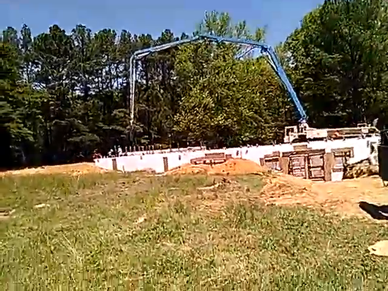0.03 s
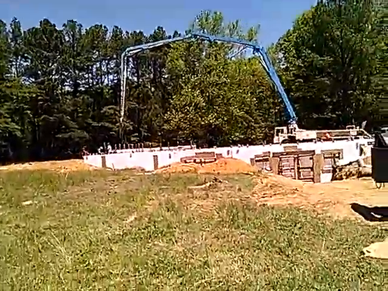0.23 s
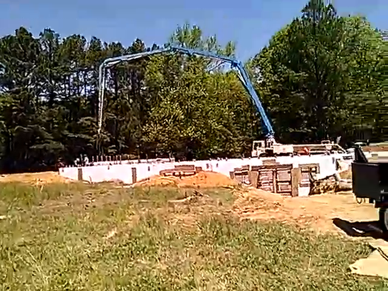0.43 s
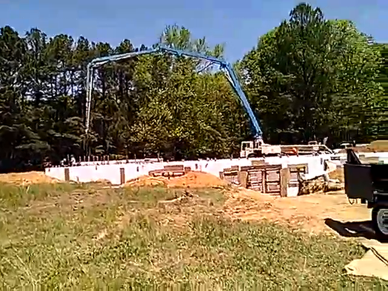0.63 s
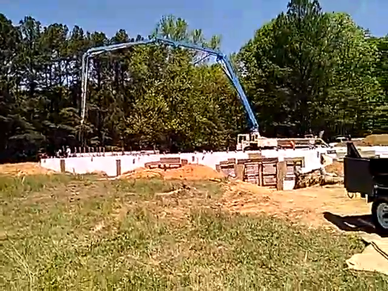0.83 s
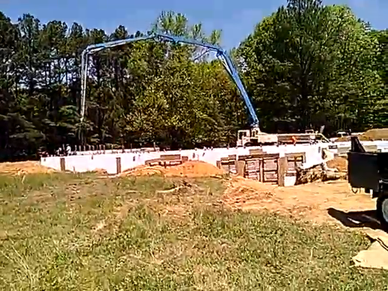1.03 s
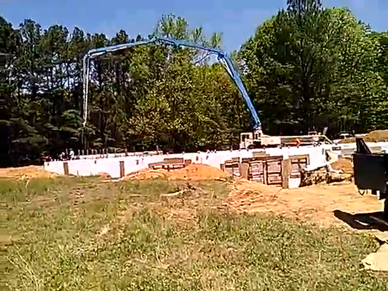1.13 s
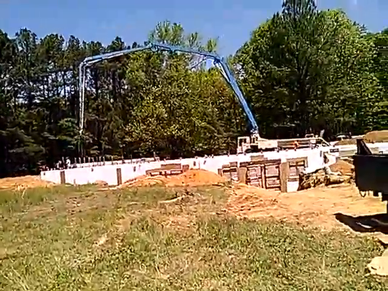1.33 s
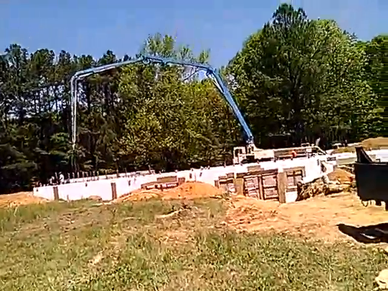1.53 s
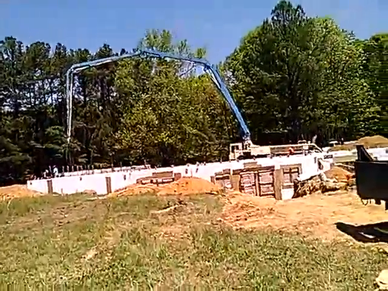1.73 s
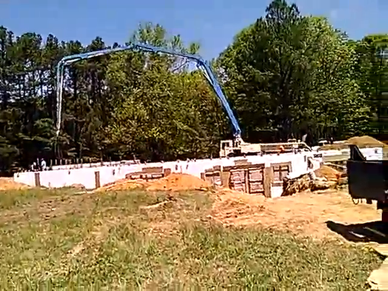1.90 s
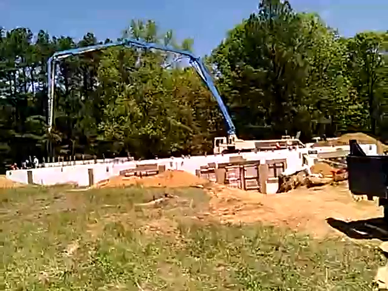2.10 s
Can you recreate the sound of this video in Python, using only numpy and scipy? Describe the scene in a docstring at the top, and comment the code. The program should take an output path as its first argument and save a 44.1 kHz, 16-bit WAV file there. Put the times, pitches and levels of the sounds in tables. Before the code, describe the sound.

A concrete pump truck's diesel drones steadily in the distance outdoors, with low throb, blurred clatter and faint whines; wind thuds on a hand-held phone microphone, and close rustles and tiny ticks come and go.

```python
"""A concrete pump truck runs steadily far across a building site: pulsed firings give a low throb, gated noise
the diesel clatter, blurred by the tree line, and wavering sines the faint whines; two thin squeals glide up.
Wind buffets the microphone of a hand-held phone: low noise follows the gusts in two bands.
Close by, dry grass and clothing rustle as the holder turns: grains and hiss, with a soft rasp of gliding
noise. Decaying sines and noise bursts make the sharp ticks, dull scuffs and light knocks."""
import sys
import numpy as np
from scipy import signal
from scipy.fft import rfft, irfft
from scipy.io import wavfile
from scipy.ndimage import uniform_filter1d, map_coordinates

SR = 44100
rng = np.random.default_rng(int(sys.argv[2]) if len(sys.argv) > 2 else 0)


def store_pcm(level_fs):
    """Save levels as 16-bit WAV."""
    pcm = np.round(np.clip(level_fs, -1, 1) * 32767).astype(np.int16)
    wavfile.write(sys.argv[1], SR, np.atleast_2d(pcm).T)


N = 95256  # length in samples

# Spectrum tables give relative density; the level is set where the noise is used.
# Diesel clatter and fan, as heard from afar [f/Hz, density/dB]
CLATTER_SPECTRUM = [(150, 4.5), (260, 1.5), (380, 1), (520, 2.5), (690, 3.5), (770, 0.5), (1000, 0.5),
                    (1230, 0.5), (1330, 3.5), (1500, -11), (2000, -10.5), (2750, -12.5), (3150, -9),
                    (3420, -6.5), (3700, -10), (4200, -11), (5200, -16), (6900, -11.5), (8000, -19.5),
                    (10000, -24.5), (11000, -29), (14500, -26)]
# Steady tones of the pump and its drive [f/Hz, rms level/dB]
WHINE_TONES = [(188, -62), (293, -73), (324, -78), (358, -75), (506.4, -72.5), (656.5, -70), (703, -70.5),
               (1013, -83), (1334, -73.5), (3360, -80), (3855, -90)]
# Side relative to mid in a stereo pair [f/Hz, level/dB]
SIDE_SPECTRUM = [(2500, -69), (3700, -46), (4300, -37), (5500, -11), (8000, -6.5), (14000, -2.5)]
# Brief thin squeals [t/s of the middle, half length/s to 1/e, f/Hz at the middle, glide/(Hz/s), rms level/dB]
SQUEAL_EVENTS = [(1.098, 0.052, 1113, 1603, -60), (1.135, 0.054, 1746, 149.8, -56.5)]
# Deep wind eddies on the microphone [f/Hz, density/dB]
EDDY_SPECTRUM = [(20, -27), (28, -22), (37, -7), (50, 6), (62, 4), (80, 2.5), (100, -5.5), (150, -33.5),
                 (400, -76)]
# Lighter wind flutter above them [f/Hz, density/dB]
FLUTTER_SPECTRUM = [(60, -13), (95, 2.5), (130, 1.5), (150, -6.5), (200, -15), (250, -30.5), (400, -49),
                    (1500, -57.5)]
# Gusts [t/s, deep rms level/dB, flutter rms level/dB]
GUST_LEVELS = [(0.0, -44.5, -57), (0.03, -35, -40), (0.07, -38, -68), (0.09, -52, -58), (0.13, -35, -45.5),
               (0.37, -41.5, -44), (0.4, -37, -36), (0.44, -44, -65), (0.47, -34, -53),
               (0.49, -45.5, -44.5), (0.58, -35, -50), (0.72, -37, -41.5), (0.78, -52, -54),
               (0.84, -45, -47), (0.87, -44, -57), (0.9, -42, -44), (0.94, -53, -49.5), (0.97, -39, -48),
               (1.06, -51.5, -47), (1.09, -42, -62), (1.12, -46, -49), (1.14, -33.5, -47), (1.23, -44, -46),
               (1.28, -40.5, -43.5), (1.36, -54, -47), (1.38, -34, -36.5), (1.42, -49, -47.5),
               (1.48, -29.5, -35), (1.51, -41, -48.5), (1.56, -35, -41.5), (1.59, -49, -45),
               (1.61, -35.5, -52), (1.7, -43.5, -46), (1.74, -35.5, -42), (1.77, -40.5, -55),
               (1.83, -39.5, -40), (1.88, -33.5, -59), (1.93, -45.5, -43.5), (2.04, -42.5, -46.5),
               (2.16, -30.5, -46.5)]
# Rustle of grass and cloth [f/Hz, density/dB]
RUSTLE_SPECTRUM = [(400, -8), (1100, -3.5), (2000, 8), (3200, -4), (4000, -2.5), (5400, 1), (6300, 8),
                   (7500, -3), (8400, 7.5), (9700, 10), (10600, -1), (12200, -1.5), (13200, -2),
                   (14200, -6)]
# Strength of the rustle [t/s, rms level/dB]
RUSTLE_LEVELS = [(0, -56.5), (.05, -51.5), (.11, -65), (.2, -67), (.27, -52.5), (.31, -60.5), (.355, -59),
                 (.39, -73), (.5, -62), (.57, -69.5), (.65, -61.5), (.8, -69.5), (.89, -57), (1.04, -59.5),
                 (1.15, -65), (1.24, -57), (1.36, -61), (1.48, -66), (1.75, -87), (1.785, -59.5),
                 (1.83, -70), (1.928, -59), (1.945, -51.5), (2.035, -52.5), (2.06, -57), (2.11, -67),
                 (2.16, -60.5)]
# Soft midrange rasp, at its reference pitch RASP_HZ [f/Hz, density/dB]
RASP_SPECTRUM = [(400, -41), (1000, -35), (1450, 2.5), (1600, 0), (1760, 1.5), (1950, -10), (2600, -17.5),
                 (6000, -59)]
# Movement of the rasp [t/s, rms level/dB, centre f/Hz]
RASP_PATH = [(0, -53.5, 1582), (.06, -56.5, 1563), (0.109, -61, 1644), (.2, -59.5, 1658),
             (.29, -56.5, 1602), (.35, -59, 1430), (.4, -73, 1457), (.7, -67.5, 1542), (.83, -60.5, 1599),
             (1.0, -62.5, 1686), (1.17, -62.5, 1700), (1.23, -63.5, 1654), (1.6, -69.5, 1601),
             (1.8, -60, 1599), (2.16, -61.5, 1587)]
# Dull scuffs of the hand on the phone; the first is a brief burst of noise joining the snap at 0.288 s [t/s,
# level/dB at the crest, decay/s]
SCUFF_EVENTS = [(0.2873, -49.5, 0.0028), (1.78, -60, 0.0099), (1.936, -49, 0.024), (1.982, -55.5, 0.027)]
# Colour of a scuff [f/Hz, density/dB]
SCUFF_SPECTRUM = [(500, 0), (1100, 5), (2000, -5.5), (3100, 0.5), (4200, -16), (8000, -8)]
# Dry stalks snapping [t/s, ring peak/dB, ring f/Hz, decay/s, crack level/dB before its colour]
SNAP_EVENTS = [(.0353, -41, 9500, .0004, -56), (0.288, -50, 9400, 0.0013, -40.5),
               (0.366, -42, 9050, 0.00018, -64), (0.505, -47.5, 6000, .0003, -63),
               (0.792, -55, 9000, .0006, -62), (0.81, -53, 8100, 0.00072, -64),
               (.916, -47.5, 9010, 0.00052, -55), (.966, -50, 7400, 0.00047, -63),
               (1.034, -52, 7500, 0.00042, -45), (1.158, -49, 7730, 0.00051, -55),
               (1.192, -55, 7520, 0.00052, -65), (1.2393, -48, 8850, 0.00065, -49),
               (1.319, -51, 7350, 0.00064, -58), (1.3464, -30.5, 8930, 0.00027, -33),
               (1.3554, -47.5, 6850, 0.00068, -50), (2.0403, -48, 9300, 0.00034, -54)]
# Colour of a snap's crack [f/Hz, gain/dB]
CRACK_SPECTRUM = [(500, -7), (2000, 4), (3800, -3.5), (5200, 1), (7000, -8), (9500, 8), (11500, -1),
                  (14000, -0.5)]
# Light knocks on the phone [t/s, level/dB before the mode gains]
KNOCK_EVENTS = [(1.183, -53), (1.784, -50)]
# Modes of the phone case [f/Hz, gain/dB, 60 dB decay time/s]
CASE_MODES = [(1900, -5, 0.0099), (2520, 0, 0.019), (3020, -7, 0.012), (4380, -10, 0.017)]

FIRING_HZ, SPEED_WANDER = 65.57, 0.00341  # mean rate, rms fraction of the speed
FIRING_SCATTER_DB = -4  # factor on a normal draw, so either sign scatters alike
THROB_DB, THROB_TOP_HZ = -49.5, 110
CLATTER_DB, CLATTER_DEPTH, CLATTER_FLICKER_DB = -52, 0.094, 1.5
TREES_DB, TREES_T60_S = -8.5, 0.99
SQUEAL_WANDER_HZ = 43.7  # rms
GRAIN_RATE_HZ, GRAIN_SPREAD_DB, GRAIN_SHARE = 1300, 3.5, 0.9  # share is relative to the hiss
RASP_HZ = 1598.6
TICK_TAIL, TICK_TAIL_S = 0.33, 0.0036  # relative to the crack, decay time
LOW_CUT_HZ, TOP_HZ = 34.2, 14400


def pump_truck():
    """Periodic excitation: uneven firings throb, clatter pulses three times a firing, and the drive whines."""
    turns = np.cumsum(1 + SPEED_WANDER * walk(4.294)) / SR  # time as warped by the engine speed, s
    cycle = FIRING_HZ * turns
    firing_size = undb(FIRING_SCATTER_DB * rng.standard_normal(512))[cycle.astype(int)]

    puffs = firing_size * np.sin(np.pi * (cycle % 1)) ** 4
    band = signal.butter(2, [40, THROB_TOP_HZ], "band", fs=SR, output="sos")
    throb = unit(signal.sosfilt(band, puffs - puffs.mean()))

    pulses = 1 + CLATTER_DEPTH * firing_size * np.cos(6 * np.pi * cycle)
    gate = pulses * undb(CLATTER_FLICKER_DB * walk(40.13))
    mid, side = (unit(trees(colour(gate * rng.standard_normal(N), CLATTER_SPECTRUM))) for _ in range(2))

    whine = np.zeros(N)
    for hz, db in WHINE_TONES:
        level = undb(db + 0.8 * walk(6.54)) * np.sqrt(2)  # rms to peak
        whine += level * np.sin(2 * np.pi * hz * turns + 0.83 * walk(12))
    return undb(THROB_DB) * throb + undb(CLATTER_DB) * spread(mid, side) + whine


def trees(x):
    """Diffuse scattering: the tree line adds an echo of exponentially decaying noise."""
    t = np.arange(SR // 2) / SR
    tail = rng.standard_normal(len(t)) * np.exp(-np.log(1000) * t / TREES_T60_S)
    echo = signal.fftconvolve(x, tail / np.linalg.norm(tail))[:N]
    return x + undb(TREES_DB) * echo


def squeals():
    """Frequency modulation: narrow, wavering tones swell once and glide upward."""
    out = np.zeros(N)
    for middle, half, hz, glide, db in SQUEAL_EVENTS:
        t = np.arange(N) / SR - middle
        phase = np.cumsum(hz + glide * t + SQUEAL_WANDER_HZ * walk(150)) / SR
        level = undb(db + 2 * walk(80.1)) * np.sqrt(2)  # rms to peak
        swell = np.exp(-(t / half) ** 2)
        out += level * swell * np.sin(2 * np.pi * phase)
    return out


def wind():
    """Turbulent pressure: eddies at the microphone rumble and flutter, each band following the gusts."""
    out = np.zeros(N)
    for column, spectrum in [(1, EDDY_SPECTRUM), (2, FLUTTER_SPECTRUM)]:
        eddies = colour(rng.standard_normal(N), spectrum)
        power = uniform_filter1d(np.abs(signal.hilbert(eddies)) ** 2, size=1300) / 2
        steady = eddies / np.sqrt(power)  # the gusts alone then set the level
        out += steady * curve(np.array(GUST_LEVELS)[:, [0, column]])
    return out


def rustle():
    """Stick-slip friction: dense slips of grass and cloth over a hiss, with a soft rasp of sliding resonance."""
    times, db, hz = np.array(RASP_PATH).T
    # reading the noise faster or slower shifts its resonance
    place = np.cumsum(np.interp(np.arange(N) / SR, times, hz) / RASP_HZ)
    rasp_noise = unit(colour(rng.standard_normal(N), RASP_SPECTRUM))
    rasp = map_coordinates(rasp_noise, [place], mode="mirror")
    return spread(slips(), slips()) * curve(RUSTLE_LEVELS) + rasp * curve(np.c_[times, db])


def slips():
    """Random impulse process: sparse grains of either sign and uneven size join a smooth hiss."""
    hits = rng.random(N) < GRAIN_RATE_HZ / SR
    size = undb(GRAIN_SPREAD_DB * np.minimum(rng.exponential(size=N), 4))
    grains = hits * rng.choice([-1, 1], N) * size
    hiss = rng.standard_normal(N)
    return unit(colour(GRAIN_SHARE * unit(grains) + hiss, RUSTLE_SPECTRUM))


def scuffs():
    """Friction noise: short dull rubs swell and die away."""
    envelope = np.zeros(N)
    for start, db, decay in SCUFF_EVENTS:
        age = np.maximum(np.arange(N) / SR - start, 0) / decay  # in decay times
        envelope += undb(db) * np.sqrt(2 * np.e * age) * np.exp(-age)  # crest is 1 before the level
    return unit(colour(rng.standard_normal(N), SCUFF_SPECTRUM)) * envelope


def ticks():
    """Impulsive fracture: each snap is a thin crack with a very short bright ring and a faint tail."""
    rings, cracks = np.zeros(N), np.zeros(N)
    for start, ring_db, hz, decay, crack_db in SNAP_EVENTS:
        t = np.arange(N) / SR - start
        age = np.maximum(t, 0)
        blow = np.exp(-age / decay)
        tail = TICK_TAIL * np.exp(-age / TICK_TAIL_S)
        cracks += undb(crack_db) * (t >= 0) * (blow + tail)
        swell = np.e * age / decay * blow  # crest is 1
        rings += undb(ring_db) * np.sin(2 * np.pi * hz * age) * swell
    return rings + colour(cracks * rng.standard_normal(N), CRACK_SPECTRUM)


def knocks():
    """Modal resonance: light taps on the phone ring a few damped modes of its case."""
    out = np.zeros(N)
    for start, db in KNOCK_EVENTS:
        age = np.maximum(np.arange(N) / SR - start, 0)
        for hz, mode_db, t60 in CASE_MODES:
            decay = np.exp(-np.log(1000) * age / t60)
            out += undb(db + mode_db) * np.sin(2 * np.pi * hz * age) * decay
    return out


def undb(db):
    """Logarithmic level: convert decibels to an amplitude gain."""
    return 10 ** (np.asarray(db) / 20)


def unit(x):
    """Root-mean-square amplitude: scale to rms 1."""
    return x / np.sqrt(np.mean(x ** 2))


def curve(rows):
    """Amplitude envelope: gain per sample from [t/s, level/dB] rows."""
    return undb(np.interp(np.arange(N) / SR, *np.array(rows).T))


def colour(x, rows):
    """Spectral shaping: filter by [f/Hz, gain/dB] rows, joined on a logarithmic frequency axis."""
    hz, db = np.array(rows).T
    f = np.maximum(np.arange(N // 2 + 1) * SR / N, 1)
    gain = undb(np.interp(np.log(f), np.log(hz), db))
    return irfft(rfft(x) * gain, N)


def walk(rate):
    """Low-pass random process: a slow wander of rms 1 from smoothed draws, rate in Hz."""
    k = int(SR / rate)
    held = rng.standard_normal(1024)[np.arange(N) // k]
    return unit(uniform_filter1d(uniform_filter1d(held, k), k))


def spread(mid, side):
    """Mid-side stereo: two channels that differ mainly in the treble."""
    return mid + colour(side, SIDE_SPECTRUM) * np.array([[1], [-1]])


def scene():
    """Superposition: the distant truck and the squeals under near wind, rustle and handling."""
    return pump_truck() + squeals() + wind() + rustle() + scuffs() + ticks() + knocks()


def record(dry):
    """Band limitation: the phone cuts the deepest bass and the top."""
    low_cut = signal.butter(6, LOW_CUT_HZ, "high", fs=SR, output="sos")
    top_cut = signal.ellip(16, .2, 90, TOP_HZ, fs=SR, output="sos")  # ripple and stopband in dB
    return signal.sosfilt(top_cut, signal.sosfilt(low_cut, dry))


dry = scene()
out = record(dry)
store_pcm(out)
```